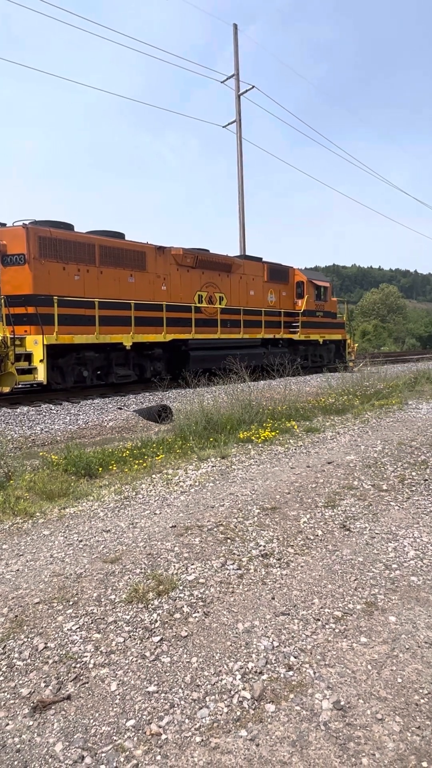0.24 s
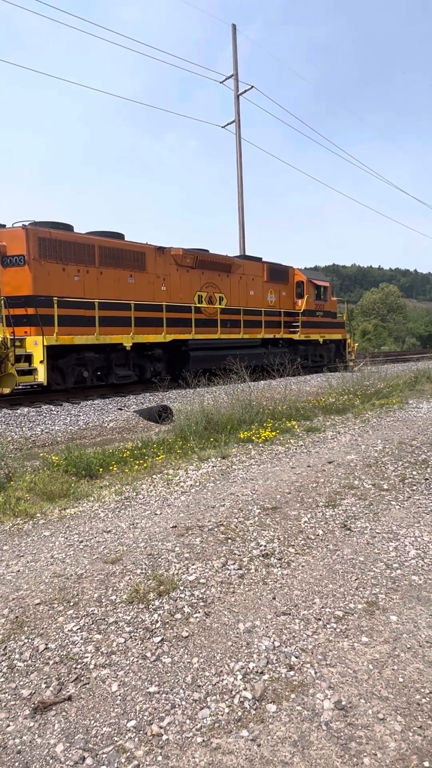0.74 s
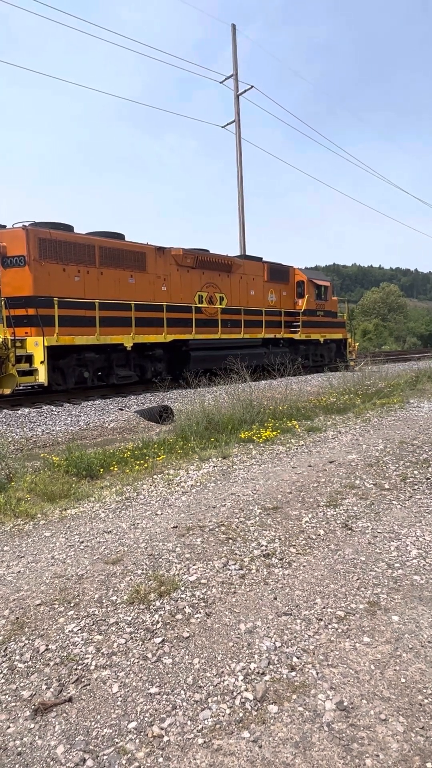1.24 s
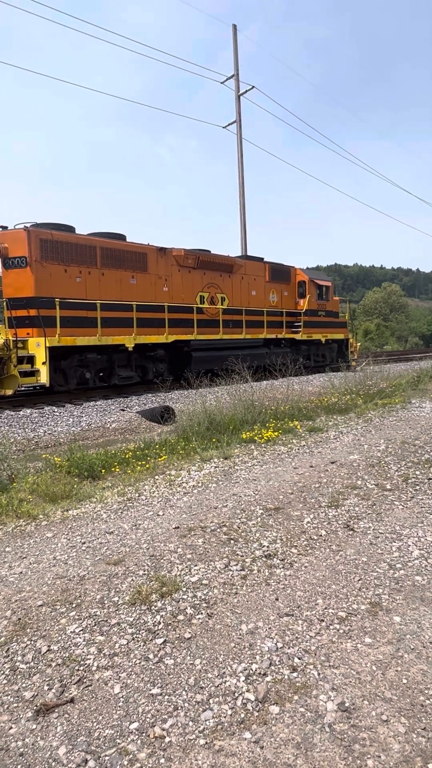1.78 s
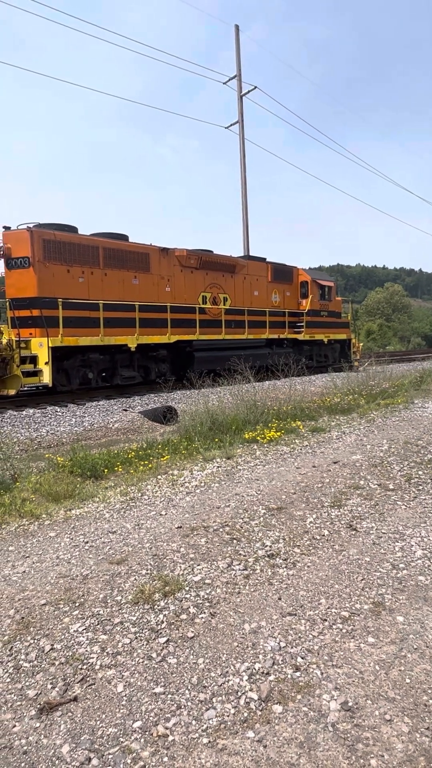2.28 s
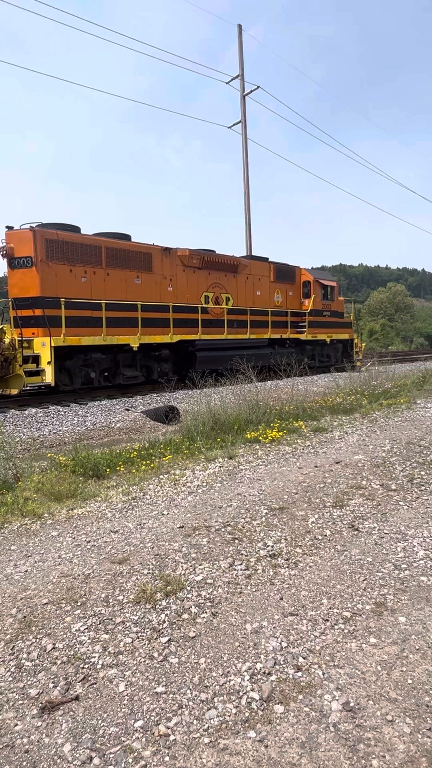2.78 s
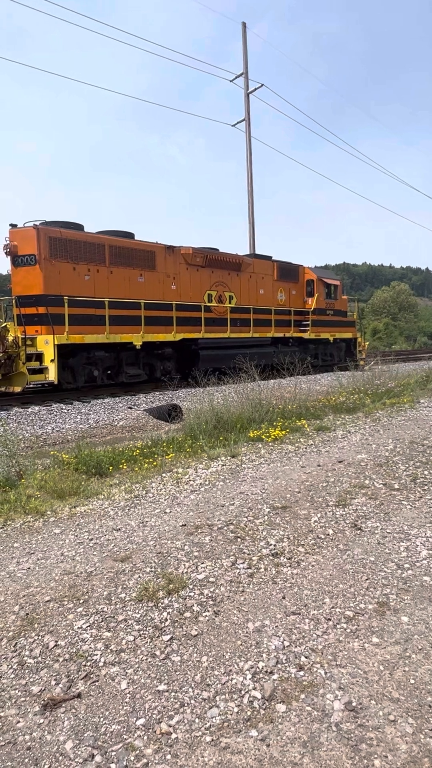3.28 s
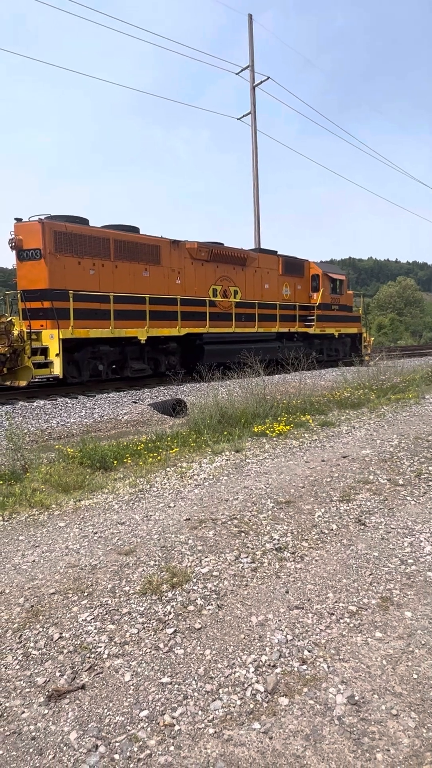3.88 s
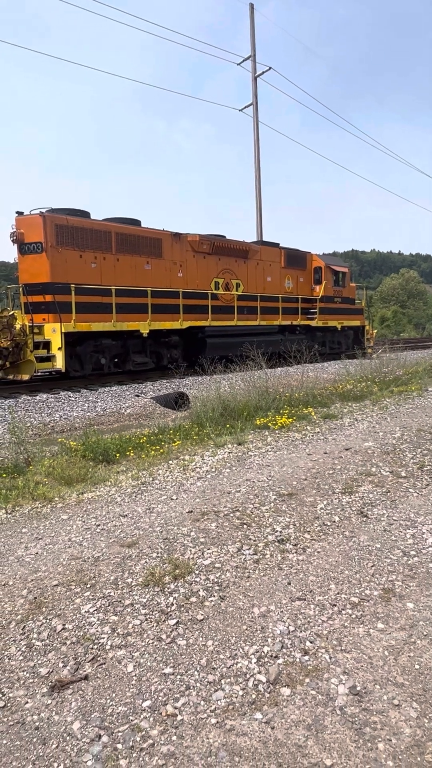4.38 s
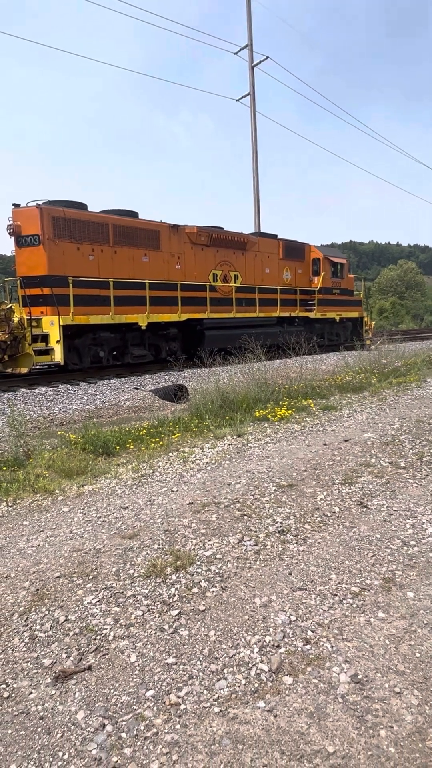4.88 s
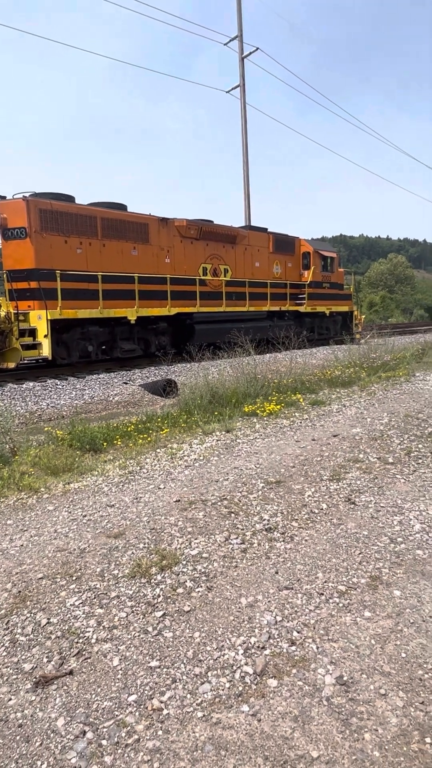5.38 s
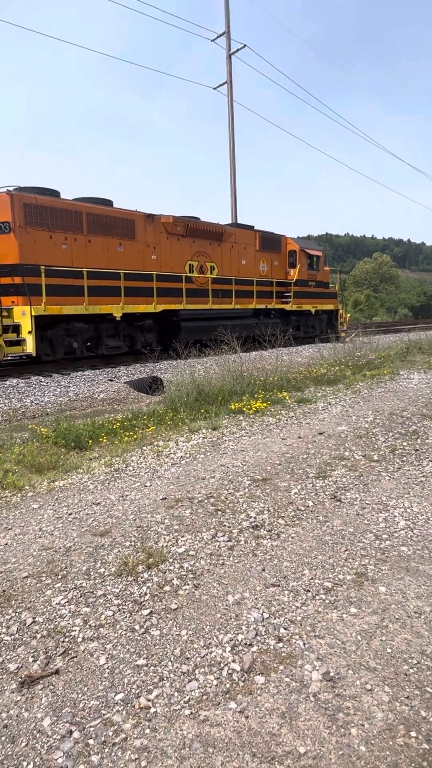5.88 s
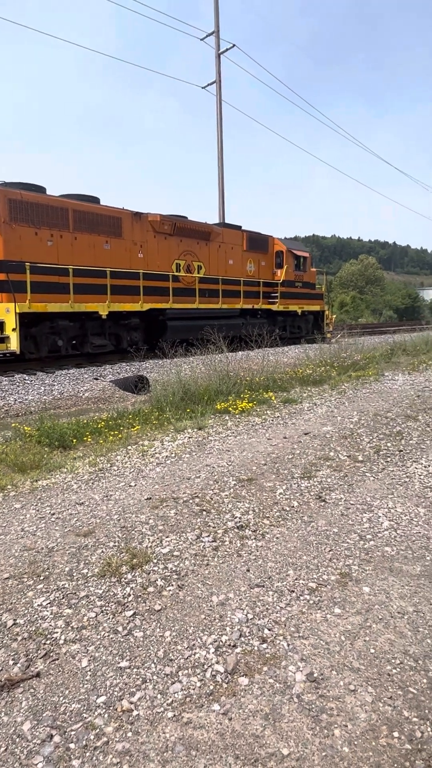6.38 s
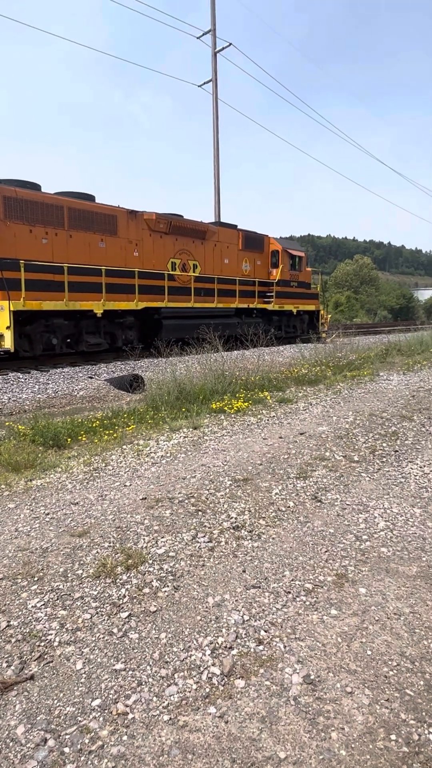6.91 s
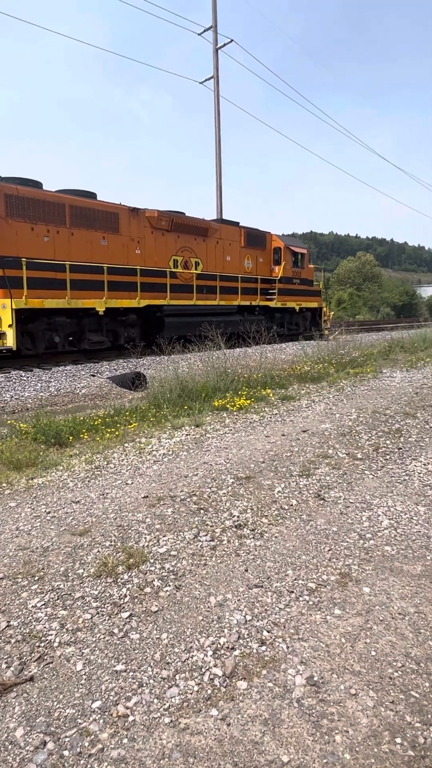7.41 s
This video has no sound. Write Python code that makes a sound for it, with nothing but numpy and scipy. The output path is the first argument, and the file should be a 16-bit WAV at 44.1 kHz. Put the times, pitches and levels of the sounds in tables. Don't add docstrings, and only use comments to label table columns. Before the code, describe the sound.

A large diesel locomotive idles steadily outdoors with a low throbbing rumble, metallic knocking, humming fans and airy hiss, broken by a brief handling click.

```python
import sys
import numpy as np
from scipy import signal
from scipy.fft import rfft, irfft, next_fast_len
from scipy.io import wavfile
from scipy.ndimage import uniform_filter1d, map_coordinates

SR = 44100
rng = np.random.default_rng(int(sys.argv[2]) if len(sys.argv) > 2 else 0)


def unload_audio(sound):
    columns = np.transpose(np.atleast_2d(sound))
    steps = np.round(np.clip(columns, -1, 1) * 32767)
    wavfile.write(sys.argv[1], SR, steps.astype(np.int16))


def boost(x):
    u = np.asarray(x, float) / 20
    return 10 ** u


N = 337365
CRANK_HZ = 3.7717


def unit(x):
    return x / np.sqrt(np.mean(x ** 2) + 1e-20)


def along(hz, at, value):
    return np.interp(np.log(hz + 1), np.log(np.add(at, 1)), value)


def curves(rows):
    s, *cols = np.transpose(rows)
    return [np.interp(np.arange(N) / SR, s, c) for c in cols]


def wobble(rate):
    coarse = np.arange(0, N + 32, 32)
    knots = rng.standard_normal(int(N * rate / SR) + 4)
    curve = map_coordinates(knots, [coarse * rate / SR])
    return np.interp(np.arange(N), coarse, curve)


def filtered(x, response):
    edge = SR // 8
    x = np.pad(x, [(0, 0)] * (x.ndim - 1) + [(edge, edge)], "reflect")
    m = next_fast_len(N + SR // 2)
    spectrum = rfft(x, m) * response(np.fft.rfftfreq(m, 1 / SR))
    return irfft(spectrum, m)[..., edge:edge + N]


def shaped(x, spectrum):
    return filtered(x, lambda hz: boost(along(hz, *np.transpose(spectrum))))


def tone(turns, db):
    return np.sqrt(2) * boost(db) * np.cos(2 * np.pi * turns)


def swing(turns):
    return np.cos(2 * np.pi * turns)


def motor():
    # t/s, f/Hz, level/dB
    revving = [
        (3.3, 96, -70),
        (3.7, 98, -48),
        (4.2, 100, -44),
        (4.7, 104, -43),
        (5.2, 106, -46),
        (6, 108, -44),
        (6.5, 108, -70),
    ]
    hz, db = curves(revving)
    return tone(np.cumsum(hz) / SR, db + wobble(3.6))


def hood(hz):
    # f/Hz, width/Hz, lift/dB
    panels = [(217, 9.4, 3.5), (439, 28, 1.5), (561, 48, 4), (692, 19, 6), (963, 39, 3), (1073, 28, 2.5),
              (1198, 26, 4.5), (1301, 12, 6), (1796, 79, 3), (1950, 65, 4), (2150, 40, 2.5),
              (2750, 120, 3.5), (2950, 150, -2.5), (3210, 160, 1.5)]
    return boost(sum(db / (1 + (2 * (hz - centre) / width) ** 2) for centre, width, db in panels))


def rush(spectrum, swell_db, patchy_db):
    z = signal.stft(rng.standard_normal((2, N)), nperseg=512)[2]
    field = uniform_filter1d(rng.standard_normal(z.shape[1:]), 6, 0)
    field = uniform_filter1d(field, 14, 1)
    pair = signal.istft(z * boost(patchy_db * unit(field)), nperseg=512)[1][:, :N]
    return unit(shaped(pair * boost(swell_db), spectrum))


def roar():
    # f/Hz, level/dB per Hz
    spectrum = [(20, -53.5), (35, -21), (45, -15.5), (56, -2.5), (68, 0), (92, -2), (104, 3), (116, -4),
                (142, -2.5), (158, -7), (225, -6.5), (260, -10.5), (600, -14), (1250, -22), (1500, -27.5),
                (2000, -30.5), (3100, -38.5), (5500, -63.5)]
    return filtered(boost(-31.5) * rush(spectrum, 0.13 * wobble(1.8), patchy_db=1), hood)


def hiss(crank, leak):
    # f/Hz, level/dB per Hz
    spectrum = [(3000, -5.5), (3700, 5), (4400, 4), (4950, -2.5), (5500, -0.5), (6200, 3), (7100, -0.5),
                (7700, -0.5), (9000, -13.5), (11500, -45.5), (15000, -32), (16000, -86)]
    breath_db = .5 * swing(crank - .15) + 0.79 * swing(2 * crank - .29)
    swell_db = 0.56 * breath_db + 0.32 * wobble(14)
    return boost(-61 + 0.5 * leak) * rush(spectrum, swell_db, patchy_db=1.56)


def thin_whine(hz, db):
    return tone(np.cumsum(hz + 2 * wobble(1.5) + 4 * wobble(40)) / SR, db + 2 * wobble(12))


def whines(leak):
    # t/s, f/Hz
    strongest = [(0.0, 4187), (1.13, 4190), (6.03, 4186), (7.65, 4194)]
    # f/Hz, level/dB, change once the air leaks/dB
    steel = [(5848, -73, -.5), (6070, -83, 0), (6500, -82.5, 2), (6935, -86, 7), (7503, -82, -3),
             (9207, -87.5, 0), (10869, -100, 0)]
    # f/Hz, level/dB
    opposed = [(9207, -87.5), (10869, -98), (12568, -101), (14225, -98)]
    hz, = curves(strongest)
    main = tone(np.cumsum(hz + 3 * wobble(40)) / SR, -65.3 + 1.2 * wobble(14) + 1.8 * wobble(60))
    faint = sum(thin_whine(f, db + more_db * leak) for f, db, more_db in steel)
    return main + faint, sum(thin_whine(f, db) for f, db in opposed)


def hum():
    t = np.arange(N) / SR
    # [(multiple, level/dB)]
    shafts = [(15.411, .07, [(4, -43.3), (6, -63)]), (77.058, .21, [(1, -43.5)]), (35.606, .17, [(3, -42),
              (4, -49.5), (5, -53)]), (59.49, -.31, [(1, -52)]), (86.05, .42, [(1, -50)]),
              (111.01, .1, [(1, -50)]), (224.33, .3, [(1, -50)]), (3.625, .2, [(9, -63), (11, -57),
              (12, -65), (13, -64), (14, -62), (15, -61)])]
    return sum(tone(k * (hz * t + start) + .02 * wobble(.8), db + .8 * wobble(.9))
               for hz, start, orders in shafts for k, db in orders)


def slips():
    # t/s, thump level/dB, thump sign, tick level/dB, tick top f/Hz
    touches = [
        (4.8787, -16.5, 1, -20, 2300),
        (4.897, -40, 1, -47, 8000),
        (4.9045, -45, 1, -47, 9000),
        (4.9088, -38, -1, -45, 5000),
        (4.9126, -30, 1, -38, 2500),
        (4.914, -12.5, -1, -33, 15000),
    ]
    # f/Hz, level/dB per Hz
    tick_colour = [(600, -20), (1500, -1), (2800, -3), (4200, 0), (6500, -5), (9000, -11), (11000, -11),
                   (15800, -19), (16200, -80)]
    t = np.arange(SR // 30) / SR
    turns = 520 * t + .95 * (1 - np.exp(-t / .0016))
    thump = np.sin(2 * np.pi * turns) * boost(-60 * t / .024) * (1 - np.exp(-t / .0006))
    ticks, thumps = np.zeros((2, N)), np.zeros(N)
    for s, db, sign, tick_db, top_hz in touches:
        scrape = (t == 0) * [[4], [3]] + .4 * rng.standard_normal((2, len(t)))
        scrape = signal.lfilter(*signal.butter(2, top_hz, fs=SR), scrape)
        ticks[:, round(s * SR) - 12:][:, :len(t)] += boost(tick_db - 60 * t / .003) * scrape
        thumps[round(s * SR):][:len(t)] += sign * boost(db + 3) * thump
    mid, side = shaped(ticks, tick_colour) * boost([[3.5], [5]]) + thumps * [[.05], [1]]
    return filtered(mid, lambda hz: np.exp(-(hz / 11800) ** 12)), side


def meshes(crank):
    # [(crank angle/turns, level/dB)]
    gears = [
        (79, [(0, -42), (.12, -40), (.22, -45), (.3, -43), (.46, -48), (.6, -40), (.73, -56), (.85, -41)]),
        (158, [(.04, -55), (.09, -37), (.13, -34), (.19, -38), (.26, -55), (.33, -57), (.4, -43), (.55, -41.5), (.62, -44.5), (.7, -39.5), (.8, -44.5), (.95, -48)]),
    ]
    tones = np.zeros(N)
    for k, rows in gears:
        load_db = uniform_filter1d(np.interp(crank % 1, *np.transpose(rows), period=1), size=300)
        tones += tone(k * crank + .05 * wobble(3), load_db + 1.5 * wobble(5) + wobble(1))
    return tones


def blows(crank):
    # f/Hz, crank angle/turns, strength/dB, change while the engine creeps on/dB
    panel_blows = [(196, 0.189, -17.0, 5.6), (196, 0.33, -22.0, 0.4), (196, 0.627, -19.5, -2.2),
                   (211, 0.533, -22.9, 2.7), (241, 0.736, -25.4, -5.6), (256, 0.674, -24.6, -3.7),
                   (400, 0.799, -27.5, 1.1), (407, 0.994, -25.9, 2.4), (422, 0.666, -21.3, 3.8),
                   (438, 0.291, -24.5, 5.3), (453, 0.018, -26.5, 2.3), (453, 0.424, -26.7, 9.0),
                   (498, 0.76, -28.5, -1.5), (513, 0.096, -25.7, 5.2), (520, 0.314, -26.2, -1.6),
                   (528, 0.471, -21.2, 5.9), (528, 0.861, -24.6, 1.5), (528, 0.963, -28.0, 2.9),
                   (558, 0.885, -24.8, 0.9), (573, 0.807, -23.7, 7.4), (634, 0.4, -22.7, 0.2),
                   (664, 0.275, -26.2, -3.7), (671, 0.986, -26.4, -0.8), (686, 0.111, -29.6, 3.7),
                   (694, 0.65, -22.8, 0.5), (717, 0.549, -22.4, -3.3), (732, 0.229, -27.1, -5.8),
                   (732, 0.783, -24.2, -4.4), (875, 0.861, -35.0, 8.4), (935, 0.057, -33.6, 1.4),
                   (943, 0.182, -33.2, 3.5), (958, 0.525, -35.3, 4.5), (966, 0.439, -31.2, 4.4),
                   (966, 0.963, -32.8, 4.6), (981, 0.611, -37.6, 9.0), (988, 0.814, -36.8, 8.8),
                   (1071, 0.869, -36.7, 6.8), (1086, 0.635, -38.0, -0.3), (1101, 0.471, -36.8, -0.9),
                   (1101, 0.986, -38.8, -1.0), (1154, 0.111, -37.4, 1.1), (1177, 0.752, -33.1, 3.6),
                   (1184, 0.369, -33.8, 2.2), (1192, 0.689, -32.7, 2.3), (1207, 0.588, -35.1, 5.7),
                   (1237, 0.072, -37.4, 2.7), (1237, 0.26, -35.8, 3.1), (1245, 0.986, -37.8, 1.8)]
    # f/Hz, crank angle/turns, strength/dB, change while the engine
    # creeps on/dB
    more_panel_blows = [(432, .53, -27, 3), (690, .585, -23.5, 0), (748, .665, -26, -5), (772, .22, -32, -6),
                        (775, .585, -29, -6), (778, .7, -33, -6), (772, .81, -33, -6), (760, .43, -33, -6),
                        (765, .97, -34, -6)]
    late_s, harder_db = .0002, 1.5
    fade_s, rise_s = .06, .0067
    t = np.arange(SR // 8) / SR
    envelope = boost(-1.3 - 60 * t / fade_s) * (1 - np.exp(-t / rise_s))
    out = np.zeros(N + SR)
    for hz, angle, db, creep_db in panel_blows + more_panel_blows:
        ring = np.sin(2 * np.pi * hz * t) * envelope
        scatter = rng.standard_normal((int(N / SR * CRANK_HZ) + 1, 2))
        for turn, (late, harder) in enumerate(scatter):
            start = abs(np.searchsorted(crank, turn + angle) + round(SR * late_s * late))
            strength = boost(db + creep_db * (start / N - .5) + harder_db * harder)
            out[start:][:len(t)] += (start < N - 99) * strength * ring
    return out[:N]


def knocks(crank, points=8192):
    # f/Hz, level/dB per Hz
    spectrum = [(130, -67), (185, -15.5), (240, -14), (290, -23), (340, -6.5), (400, -12.5), (570, -9),
                (596, -28), (625, -9.5), (740, -14.5), (1100, -23.5), (1300, -21), (1500, -23), (2000, -24),
                (2700, -32.5), (3400, -39.5), (4500, -67)]
    patterns = unit(irfft(np.exp(2j * np.pi * rng.random((3, points // 2 + 1))), points))
    angles = np.arange(points) / points
    steady, slow, quick = [np.interp(crank % 1, angles, p, period=1) for p in patterns]
    drift = 0.3 * wobble(.5) * slow + 0.25 * wobble(2.5) * quick
    throb_db = 1.3 * swing(crank + 0.47) + 0.88 * swing(2 * crank - .22) + 1.8 * swing(19 * crank - .13)
    rattle = unit(shaped(boost(throb_db) * (steady + drift), spectrum))
    return boost(-43.5) * filtered(rattle, hood)


def exhaust(crank):
    firing = [-43, -49, -54, -52, -53.5, -51, -48, -31, -40.5, -38.5, -42.5, -36.2, -44, -44.5, -41.4, -46,
              -46.5, -46, -52, -52.5, -49, -47, -48.5, -51.5, -48.6, -40, -60, -54.5, -48.5, -47, -63, -52,
              -47.5, -60, -51, -63, -64, -52]
    # multiple of crank speed, level/dB
    gears = [(48, -51), (49, -49), (56, -47), (113, -49.5)]
    orders = dict(enumerate(firing, 8)) | dict(gears)
    throb = np.zeros(N)
    for k, db in sorted(orders.items()):
        d = k - 16
        shift = .3785 * d ** 3 + .052 * d ** 2 - .025 * d - .013
        throb += tone(k * crank + shift, db + (.6 + k / 150) * wobble(1 + k / 60))
    return throb


def crankshaft():
    # t/s, crank lead/turns
    hunting = [(0, -.008), (.25, -.0068), (1.75, .0004), (2.75, -.0006), (3.25, .0005), (4.5, .001),
               (5.75, -.0013), (6.75, .0002), (7.65, .0002)]
    return CRANK_HZ * np.arange(N) / SR + curves(hunting)[0]


def spread(front, air_side):
    # f/Hz, level/dB, share that follows the mid (-1..1)
    width = [(30, -46, -0.092), (110, -23.5, -0.83), (358, -17.5, -0.84), (640, -10, -1.05),
             (860, -10, -0.33), (1110, -15, -0.58), (1860, -18, -0.51), (2800, -2.5, 0.16),
             (3600, -6, 0.66), (5000, 0, 0.16), (6360, -14, -0.0085), (9100, -4.5, 0.1), (9500, -8.5, 0.1),
             (10400, -2.5, 0.1), (12300, 1, 0), (14400, -6, 0)]
    at, db, share = np.transpose(width)
    share = np.clip(share, -1, 1)
    rest = np.sqrt(1 - share ** 2)
    follows = filtered(front, lambda hz: boost(along(hz, at, db)) * along(hz, at, share))
    loose = filtered(air_side, lambda hz: boost(along(hz, at, db + 3.5)) * along(hz, at, rest) * (hz < 14500))
    return follows + loose


def port_notch(hz):
    return (1 - 0.75 / (1 + ((hz - 835) / 40) ** 2)) * (hz < 11720)


def scene():
    crank = crankshaft()
    leak = crank > CRANK_HZ * 4.9
    whine, aside = whines(leak)
    air = roar() + hiss(crank, leak)
    engine = exhaust(crank) + knocks(crank) + blows(crank) + meshes(crank)
    front = engine + hum() + motor() + whine + air[0]
    side = spread(front, air[1]) + aside
    side = side + tone(220 * crank, -47 + 1.5 * wobble(2))
    slip_mid, slip_side = slips()
    mid = filtered(front, port_notch) + slip_mid
    side = boost(0.25) * side + slip_side
    return np.array([mid + side, mid - side])


def band_limit(x):
    return signal.sosfilt(signal.butter(12, 15900, fs=SR, output="sos"), x)


def record(dry):
    return band_limit(dry)


dry = scene()
out = record(dry)
unload_audio(out)
```